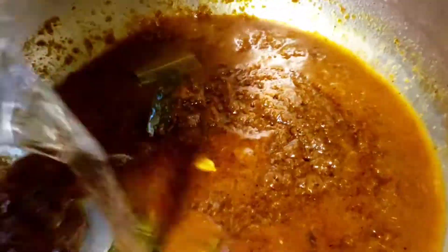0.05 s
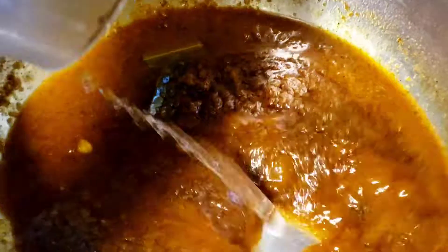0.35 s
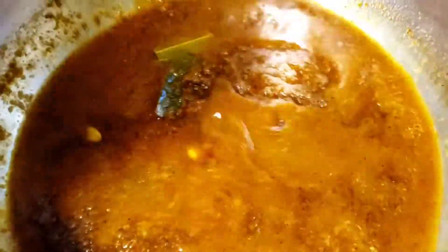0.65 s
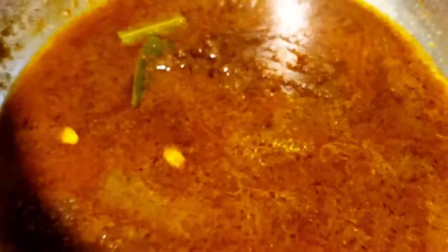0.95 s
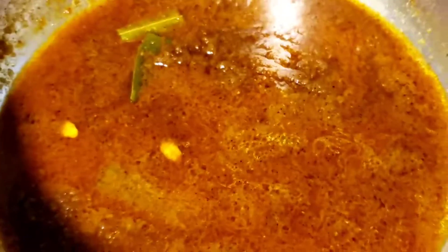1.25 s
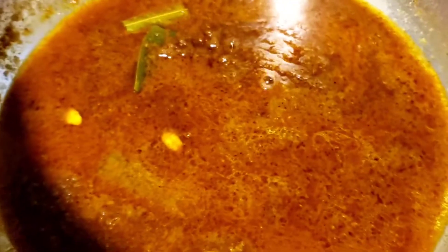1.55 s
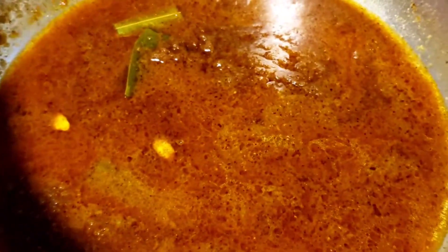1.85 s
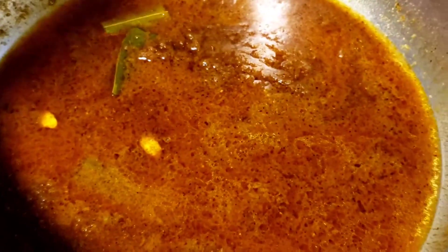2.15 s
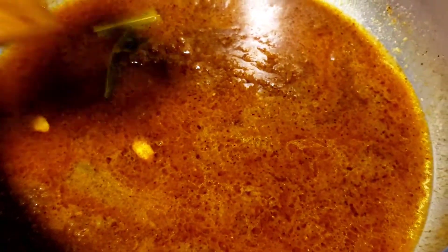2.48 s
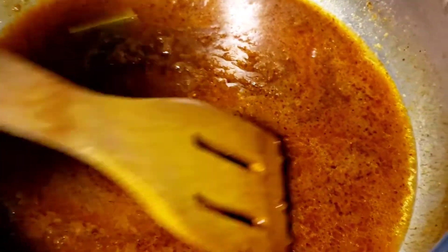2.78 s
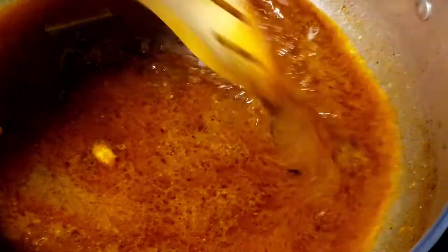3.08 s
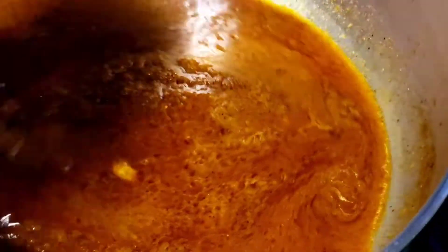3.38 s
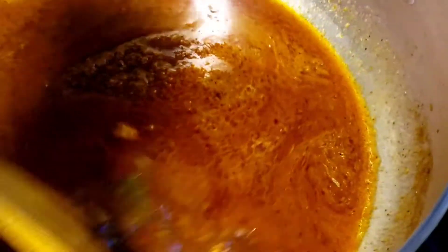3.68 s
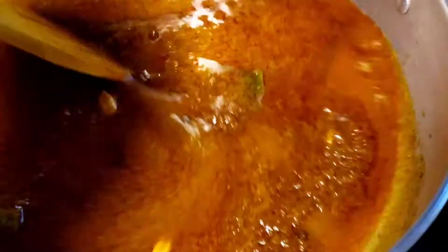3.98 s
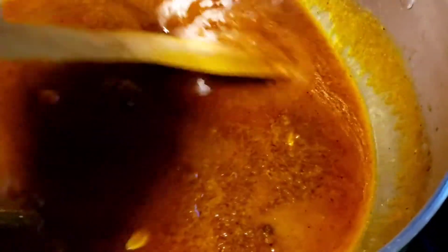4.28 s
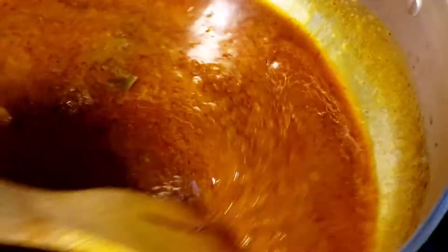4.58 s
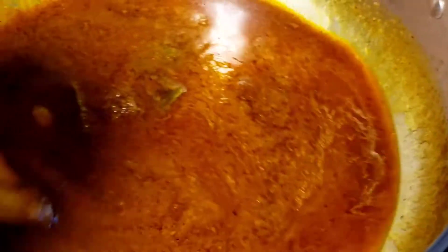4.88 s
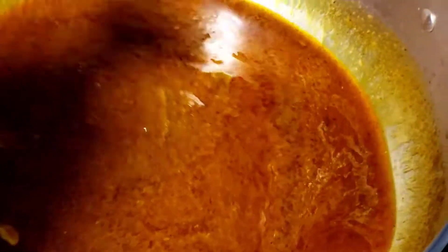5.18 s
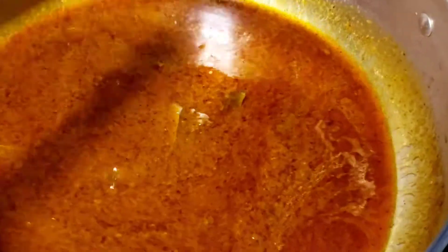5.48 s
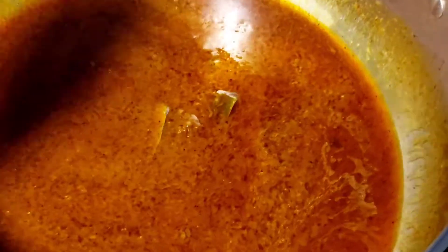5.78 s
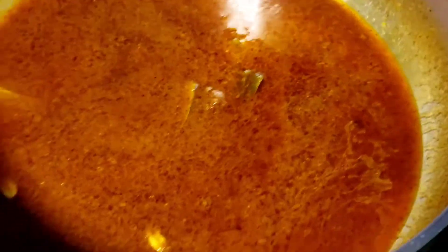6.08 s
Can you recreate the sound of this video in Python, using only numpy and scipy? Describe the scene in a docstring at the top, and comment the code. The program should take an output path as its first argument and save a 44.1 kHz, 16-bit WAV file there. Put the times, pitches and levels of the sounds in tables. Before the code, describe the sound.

Close above a pan in a small kitchen, a burst of steamy sizzling and bubbling starts as water lands in hot oil. It sinks to a soft simmer, with droplets snapping over the low rumble of a burner. About halfway through, a wooden spatula stirs for a couple of seconds with irregular ringing knocks, scrapes and a few tiny squeaks. Then only gentle simmering and the flame remain.

```python
"""In a small kitchen, a burner rumbles under a metal pan of hot oil and spice paste.
Water gulps in and flashes to steam with a loud sizzle, which sinks as the oil cools. The sauce then
simmers: tiny bubbles crackle on the hot metal and a few droplets burst as spits of oil.
A wooden spatula stirs, scraping and knocking the pan so that the metal rings."""
import sys
import numpy as np
from scipy import signal
from scipy.fft import rfft, irfft, next_fast_len
from scipy.io import wavfile

SR = 44100
rng = np.random.default_rng(int(sys.argv[2]) if len(sys.argv) > 2 else 0)


def log_audio(samples):
    """Write samples as a 16-bit WAV file to the path given in sys.argv[1]."""
    # one column per channel
    frames = np.atleast_2d(samples).T
    # limit to full scale, then quantise
    limited = np.clip(frames, -1, 1)
    pcm = np.round(limited * 32767).astype(np.int16)
    wavfile.write(sys.argv[1], SR, pcm)


N = 275625
TIME = np.arange(N) / SR
BAND_EDGES_HZ = np.geomspace(80, 15000, 16)


def from_db(db):
    """Turn decibels into a number to multiply by."""
    return np.exp(np.asarray(db) * (np.log(10) / 20))

def lean(left_db):
    """Gains that make the left side this much louder than the right; below 0 leans right."""
    return from_db(left_db * np.array([[.5], [-.5]]))

def rms_one(x):
    """Scale a sound to an average power of 1."""
    return x / np.sqrt(np.mean(x ** 2) + 1e-20)

def at_hz(points, hz):
    """Read a table at any pitch, sliding between its rows."""
    pitches, values = np.transpose(points)
    return np.interp(np.log(hz + 1e-9), np.log(pitches), values)

def near(hz, centre_hz, octaves):
    """A bell curve over pitch: 1 at the centre, 0 far away."""
    return np.exp(-(np.log2((hz + 1e-9) / centre_hz) / octaves) ** 2)

def ramp(start_s, length_s):
    """Rise from 0 to 1."""
    return np.clip((TIME - start_s) / length_s, 0, 1)

def drift(per_s):
    """A random wobble of about size 1."""
    knots = rng.standard_normal(2000)
    return rms_one(np.interp(TIME * per_s, np.arange(len(knots)), knots))

def noise():
    """Two unrelated white noises."""
    return rng.standard_normal((2, N))

def shaped(x, gain_at):
    """Filter a sound by giving each frequency its own gain."""
    size = next_fast_len(N + 4096)
    hz = np.arange(size // 2 + 1) * SR / size
    return irfft(rfft(x, size) * gain_at(hz), size)[..., :N]

def resonant(x, peaks):
    """Boost a few narrow pitches in a sound."""
    return shaped(x, lambda f: 1 + sum((from_db(db) - 1) / (1 + ((f - hz) / width) ** 2)
                                       for hz, width, db in peaks))

# How alike the left and right sides sound: (pitch [Hz], likeness [0 to 1])
LIKENESS = [(60, 0.99), (200, 0.91), (350, 0.81), (700, 0.66), (1400, 0.016), (3000, 0.051), (6000, 0)]
def two_ears(pair, hz):
    """Mix two unrelated sounds into left and right: alike in the bass, unrelated in the treble."""
    alike = np.clip(at_hz(LIKENESS, hz), 0, 1)
    return (np.sqrt(1 + alike) * pair[0] + np.sqrt(1 - alike) * pair[1] * [[1], [-1]]) / np.sqrt(2)

def coloured(pair, colour):
    """Stereo sound of power 1 with the given colour (its mix of low and high pitches)."""
    hz = np.arange(N // 2 + 1) * SR / N
    return rms_one(irfft(two_ears(rfft(pair), hz) * from_db(at_hz(colour, hz)), N))

def walls(x, echo_db):
    """Quick echoes off the pan, stove and tiles, different on each side."""
    out = x.copy()
    for k, lag in enumerate(rng.integers(SR // 300, SR // 40, 12)):
        out[k % 2, lag:] += from_db(echo_db) * x[k % 2, :-lag]
    return out

def ring(clicks, hz, t60):
    """Each click starts a tone; t60 is its ring time, the seconds it takes to fade by 60 dB."""
    decay, angle = from_db(-60 / (t60 * SR)), 2 * np.pi * hz / SR
    return signal.lfilter([0, np.sin(angle)], [1, -2 * decay * np.cos(angle), decay ** 2], clicks + 1e-18)

def grains(per_s, spread_db):
    """Random clicks of uneven size."""
    out, at = np.zeros(N), rng.integers(0, N, int(per_s * N / SR))
    sizes = from_db(spread_db * np.minimum(rng.exponential(1, len(at)), 4))
    out[at] = sizes * rng.choice([-1, 1], len(at))
    return out

def bubbles(low_hz, high_hz, per_s, spread_db, cycles, count):
    """Bubbles of `count` sizes burst at random, each ringing for a few cycles."""
    out = np.zeros((2, N))
    for k, hz in enumerate(np.geomspace(low_hz, high_hz, count)):
        out[k % 2] += np.sqrt(hz) * rms_one(ring(grains(per_s / count, spread_db), hz, cycles / hz))
    return rms_one(out)

def ping(s, level_db, hz, t60):
    """One bubble: a tone that swells in about two cycles and dies away."""
    out, t, start = np.zeros(N), np.arange(SR // 10) / SR, round(s * SR)
    swell = 1 - np.exp(-t * hz / 2)
    out[start:start + len(t)] = swell * from_db(level_db - 60 * t / t60) * np.sin(2 * np.pi * hz * t)
    return out

def glides(rows, waver):
    """Short tones that swell, slide and fade; the pitch wobbles by the fraction `waver`."""
    out = np.zeros(N)
    for s, length, start_hz, end_hz, db in rows:
        progress, start = np.linspace(0, 1, int(length * SR)), round(s * SR)
        hz = (start_hz + (end_hz - start_hz) * progress) * (1 + waver * drift(610)[:len(progress)])
        tone = np.sin(2 * np.pi * np.cumsum(hz) / SR)
        out[start:start + len(tone)] += from_db(db) * np.sin(np.pi * progress) * tone
    return out

def bursts(hits, shared_colour, t60s, rise_s, crack_s, tail_db):
    """Each hit is a short crack of noise with a tail that fades at its own speed in each pitch band."""
    t = np.arange(SR // 3) / SR
    out, noises = np.zeros((2, N)), rng.standard_normal((len(hits), 2, 2, len(t)))
    for k, (low, high) in enumerate(zip(BAND_EDGES_HZ, BAND_EDGES_HZ[1:])):
        hz, track = np.sqrt(low * high), np.zeros((2, N + len(t)))
        tail = from_db(tail_db - 60 * t / at_hz(t60s, hz))
        envelope = (1 - np.exp(-t / rise_s)) * (np.exp(-t / crack_s) + tail)
        for (s, colour, left_db), white in zip(hits, noises):
            gain = from_db(at_hz(colour, hz) + at_hz(shared_colour, hz)) * lean(left_db)
            start = round(s * SR)
            track[:, start:start + len(t)] += gain * envelope * two_ears(white[k % 2], hz)
        band = signal.butter(2, [low, high], "band", fs=SR, output="sos")
        out += signal.sosfilt(band, track[:, :N] + 1e-18)
    return out


# Colour of the stove's rumble: (pitch [Hz], level [dB])
RUMBLE_COLOUR = [(25, 2.5), (45, -0.5), (62, 11.5), (76, 3.5), (91, 5.5), (110, -5), (150, -8.5),
                 (300, -46)]
def stove(knocks):
    """The stove rumbles, louder once the spatula goes in; each knock shakes the pan on it."""
    rumble_db, rise_db, shake_db, shake_t60 = -53, 5, -18.5, 1.3
    jolts = np.zeros(N)
    for s, db, *_ in knocks:
        jolts[round(s * SR)] = from_db(db + shake_db) ** 2
    shake_power = signal.lfilter([1], [1, -from_db(-60 / (shake_t60 * SR)) ** 2], jolts)
    steady = from_db(rumble_db + rise_db * ramp(start_s=2.47, length_s=0.79))
    return np.sqrt(steady ** 2 + shake_power) * coloured(noise(), RUMBLE_COLOUR)

# Colour of the flame: (pitch [Hz], level [dB])
FLAME_COLOUR = [(50, -8.5), (130, -3.5), (180, -6), (215, -12.5), (330, -5.5), (410, -12), (690, -9),
                (800, -14.5), (1120, -14), (1550, -25.5), (3000, -39)]
# The flame's hums and the hiss of its jet: (pitch [Hz], width [Hz], boost [dB])
FLAME_PEAKS = [(175.4, 14, 11.5), (237.3, 2.9, 15), (686, 8.3, 5.5), (953, 3.8, 8), (3380, 247, 22)]
def flame():
    """The flame rushes steadily, with a few narrow hums and a thin hiss."""
    return resonant(from_db(-57.5) * coloured(noise(), FLAME_COLOUR), FLAME_PEAKS)

# Brief flares and sags of the frying: (time [s], half-length [s], change [dB])
FLARES = [(0.2, 0.028, -2), (0.33, 0.029, 2), (0.582, 0.06, 0), (0.988, 0.02, 0.5), (3.302, 0.02, 5),
          (3.512, 0.022, 4.5), (3.773, 0.029, 5.5), (3.89, 0.034, 5.5), (3.961, 0.019, 5)]
def flaring():
    """A gain that jumps or dips as liquid meets or leaves bare hot metal."""
    return from_db(sum(db * np.exp(-((TIME - s) / length) ** 2) for s, length, db in FLARES))

COVERED_S, COVERING_S = 1.61, 0.015   # when, and how fast, the sauce covers the last hot spot
# How hard the edge of the sauce fries: (time [s], level [dB])
SIMMER_LEVELS = [(1.62, -60), (2.2, -61), (2.52, -58.5), (2.92, -58.5), (3.72, -55.5), (4.2, -57.5),
                 (4.77, -55.5), (5.15, -62.5), (5.45, -63.5), (6.25, -64)]
# Colour of the frying: (pitch [Hz], level [dB])
FRYING_COLOUR = [(600, -4), (2000, -11), (3000, -3), (4300, -3), (5500, 2.5), (6500, -0.5), (7800, -4),
                 (9200, -2.5), (12000, 1), (14500, -2)]
def simmering():
    """Tiny bubbles crackle where sauce meets bare metal, mostly on the right; the finest ones fizz."""
    level_db = np.interp(TIME, *np.transpose(SIMMER_LEVELS))
    fizz_db = level_db.mean() + 1.08 * (level_db - level_db.mean())   # the fizz swings a little more
    crackle = bubbles(1950, 10200, per_s=3000, spread_db=1, cycles=3.7, count=20) + 2.23 * noise()
    pops = bubbles(3500, 13500, per_s=45, spread_db=2, cycles=12, count=10)
    crackle = coloured(walls(rms_one(crackle) + from_db(-13) * pops, echo_db=-17), FRYING_COLOUR)
    fizz = shaped(crackle, lambda hz: 1 - 1 / (1 + (hz / 8000) ** 8))   # the part above 8000 Hz
    frying = from_db(level_db + 4.5) * (crackle - fizz) + from_db(fizz_db + 4) * fizz
    return ramp(COVERED_S - COVERING_S, COVERING_S) * flaring() * lean(-3.5) * frying

# Bubbles in the sauce: (time [s], level [dB], pitch [Hz])
SAUCE_BLIPS = [(1.859, -48, 775), (1.91, -43, 730), (2.302, -38, 523), (2.343, -50, 565),
               (2.399, -39.5, 710), (2.459, -44, 566), (2.686, -47, 945)]
def blipping():
    """Slow bubbles break in the thick sauce, each with a short note."""
    return from_db(8.5) * sum(ping(s, db, hz, t60=0.011) for s, db, hz in SAUCE_BLIPS)

# Spits of oil: (time [s], level [dB], pitch [Hz], drop away from that pitch [dB per octave])
SPITS = [(1.648, -44.5, 6800, 19), (1.6892, -54, 11400, 3), (1.8563, -48, 5300, 8),
         (1.8916, -47, 11900, 14), (1.909, -48.5, 7000, 1), (2.164, -57, 5300, 3), (2.283, -50, 11500, 15),
         (2.29, -51, 12500, 1), (2.332, -50, 7300, 12), (2.338, -53, 11500, 12), (2.4304, -52, 6220, 17),
         (2.458, -55.5, 5300, -1.5), (2.486, -53, 6000, 14), (2.58, -47.5, 13300, 5),
         (2.6864, -41.5, 4580, 10), (2.695, -46, 5400, 2.5), (2.859, -46, 6450, 3), (3.026, -45, 3970, 7),
         (3.126, -46, 14000, 0.5), (3.2059, -43.5, 5430, 8), (3.2131, -45.5, 6000, 3),
         (3.418, -47, 12000, 1), (3.616, -43, 4520, 14), (3.626, -37, 4880, 18), (3.669, -43, 5750, 2),
         (3.677, -45.5, 13200, 3), (3.833, -47, 13700, 5)]
# Colour shared by all the snaps: (pitch [Hz], level [dB])
SPIT_COLOUR = [(100, -18), (1000, 9), (2000, -7), (3500, 0.5), (5700, 5), (8000, -7), (12000, 4),
               (14500, 11)]
# The finest spits lean to the right: (pitch [Hz], left minus right [dB])
SPIT_SIDE = [(5000, 1.5), (13000, -0.5)]
def spitting():
    """Single droplets burst in the oil with a snap and a brief ring."""
    hits, rings = [], np.zeros((2, N))
    for s, db, hz, drop_db in SPITS:
        octaves_away = np.minimum(abs(np.log2(BAND_EDGES_HZ / hz)), 2)
        left_db = at_hz(SPIT_SIDE, hz)
        hits.append((s, np.c_[BAND_EDGES_HZ, db - drop_db * octaves_away], left_db))
        rings += ping(s, db + 4, hz, t60=0.014) * lean(left_db)
    snaps = bursts(hits, SPIT_COLOUR, t60s=[(1000, 0.29), (12000, 0.13)],
                   rise_s=0.0006, crack_s=0.001, tail_db=-21)
    return from_db(18) * snaps + rings

BOTTOM_HZ, WALL_HZ = 147, 317   # pitches of the pan's bottom and wall
# The notes the filled pan rings at: (pitch [Hz], level [dB], ring time [s])
PAN_NOTES = [(132, -2, 0.22), (155.8, -10.5, 0.49), (276, 2, 0.026), (307.7, -3.5, 0.2), (342, -10.5, 0.22),
             (372.2, -7.5, 0.22), (473.4, -18.5, 0.22), (514, -6, 0.1), (575, -26, 0.16), (695, -9.5, 0.2),
             (769, -14.5, 0.11), (858, -21, 0.24), (1006, -6, 0.15), (1117, -10, 0.21), (1166, -7, 0.072),
             (1263, -6, 0.089), (1390, -14, 0.36), (1650, -13, 0.18), (1745, -7.5, 0.091),
             (1980, -22, 0.23), (2600, -10, 0.089), (3640, -33, 0.093), (3900, -33, .12),
             (5490, 11.5, 0.022), (6220, -2.5, 0.06)]
def pan(hits, rubbing, chance_db):
    """Hits and rubbing ring the pan, a little differently each time; each spot favours some notes."""
    out, at = np.zeros((2, N)), [round(hit[0] * SR) for hit in hits]
    chances = rng.normal(0, chance_db, (len(hits), len(PAN_NOTES)))
    for k, (hz, db, t60) in enumerate(PAN_NOTES):
        force = rubbing * WALL_HZ / max(hz, WALL_HZ)
        pushes = [at_hz(colour, hz) + boost_db * near(hz, favoured_hz, octaves=0.12)
                  for _, colour, favoured_hz, boost_db in hits]
        force[at] += from_db(pushes + chances[:, k])
        sign = -1 if k % 4 == 2 else 1   # some vibrations face away from the microphones
        note = sign * from_db(db) * ring(force, hz, t60)
        out += [note, np.roll(note, 3 * (k % 5 - 2))]   # shifted a few samples on the right
    return out * lean(1)

# Colour of the pan's many crowded notes: (pitch [Hz], level [dB])
CLATTER_COLOUR = [(100, -5.5), (200, -6), (330, -7), (440, -6.5), (700, -5.5), (1100, 0), (2200, -1.5),
                  (3500, -1.5), (5700, -2.5), (8000, -8.5), (14000, -16)]
# How long they last: (pitch [Hz], ring time [s])
CLATTER_T60 = [(100, 0.58), (300, 0.44), (1000, 0.32), (2000, 0.27), (5000, 0.16), (14000, 0.18)]
def clatter(hits):
    """A knock wakes so many notes that they blur into noise, strongest near the pan's main notes."""
    level_db, boost_db, width_hz = 12, 5, 14
    blur = bursts([(s, colour, 0) for s, colour, *_ in hits], CLATTER_COLOUR, CLATTER_T60,
                  rise_s=0.0011, crack_s=0.0035, tail_db=0)
    def gain_at(f):
        peaks = sum(1 / (1 + 1j * (f - hz) / width_hz) for hz, *_ in PAN_NOTES)
        return 1 + (from_db(boost_db) - 1) * peaks
    return shaped(from_db(level_db) * blur, gain_at)

def ticks(knocks):
    """Wood slaps the thin wall: a tick with a bright edge, as the pan starts to ring."""
    clicks = np.zeros(N)
    for s, _, _, _, tick_db, *_ in knocks:
        clicks[round(s * SR)] = from_db(tick_db)
    return ring(clicks, hz=1110, t60=0.0021) + from_db(-10.5) * ring(clicks, hz=5270, t60=0.0012)

# Squeaks of the spatula: (time [s], length [s], pitch [Hz], level [dB])
SQUEAKS = [(3.4, .045, 690, -45), (3.622, .048, 880, -46), (4.350, .075, 1147, -42),
           (4.350, .048, 315, -34), (4.808, .034, 1260, -45)]
def squeaking():
    """Wood catches on the metal and keeps one note singing."""
    return glides([(s, length, hz, hz, db) for s, length, hz, db in SQUEAKS], waver=0.018)

# Push of a medium-hard wooden knock: (pitch [Hz], level [dB])
KNOCK_COLOUR = [(315, 0), (480, -4.5), (700, -4), (1020, -12), (2200, -19), (4360, -25)]
def knock_colour(strength_db, hardness, boom_db, missed_hz):
    """Harder knocks are brighter, the bottom booms, and notes that are still at that spot stay weak."""
    hz = BAND_EDGES_HZ
    brightness = hardness * np.log2(np.clip(hz, WALL_HZ, KNOCK_COLOUR[-1][0]) / WALL_HZ)
    boom = at_hz([(BOTTOM_HZ, boom_db), (WALL_HZ, 0)], hz)
    dip = -6 * near(hz, missed_hz, octaves=0.29)
    return np.c_[hz, strength_db + at_hz(KNOCK_COLOUR, hz) + brightness + boom + dip]

# Spatula strokes over the bottom: (time [s], length [s], scrape level [dB])
STROKES = [(3.05, 0.13, -43), (3.404, 0.34, -45.5), (3.79, 0.18, -46.5), (3.935, 0.039, -51),
           (4.083, 0.13, -60), (4.33, 0.06, -50), (4.434, 0.056, -41), (4.734, 0.26, -51)]
# Spatula knocks: (time [s], strength [dB], hardness [dB per octave], boom [dB], tick [dB],
# favoured pitch [Hz], its boost [dB], missed pitch [Hz])
KNOCKS = [(3.014, -44, -4, 2.5, -53, 510, 4, 1000), (3.101, -33.5, -3, 3, -40, 500, 3, 1080),
          (3.150, -42, -11, 11, -46, 695, 10, 1300), (3.3, -47.5, 0.5, -4, -32.5, 700, 6, 1800),
          (3.387, -34, -2.5, 2, -42, 336, 4.5, 520), (3.405, -41.5, 1, -13, -41, 695, 17, 1390),
          (3.446, -34.5, -9, -18, -47, 373, 4.5, 870), (3.550, -27.5, -2.6, -2.5, -44, 514, 8, 1180),
          (3.571, -35.5, 4, -26, -31, 695, 5, 1720), (3.595, -36.5, 0.5, 5, -40, 342, 7.5, 1050),
          (3.725, -50.5, 3, 5, -48, 1280, 1, 800), (3.821, -43, 1.5, 8.5, -46, 1700, -2, 620),
          (3.846, -33.5, -3.5, 1.5, -41, 695, 4, 920), (3.881, -53, 0, 17, -54, 514, 1, 310),
          (4.059, -40.5, -2, 7.5, -53, 320, 4.5, 1100), (4.119, -22, -0.84, -4, -28, 300, 7.5, 830),
          (4.181, -25, 0.84, -4, -13.5, 695, 8.5, 1370), (4.200, -41, -7, -9, -39, 510, 25, 1100),
          (4.312, -33.5, -2, -7, -32.5, 695, 7, 1800), (4.352, -27.5, -1.5, -3.5, -39, 695, 3, 1400),
          (4.425, -31, 0.5, -8, -22.5, 750, 11.5, 1430), (4.446, -42, -5, -19, -47, 695, 5, 500),
          (4.7105, -36, 5.5, -12, -33, 1263, 8, 900), (4.713, -23.5, 0, -0.5, -28, 348, 8, 500),
          (4.833, -41, 5, 5, -31, 317, 11.5, 620), (4.850, -39, 0, 10.5, -44, 1390, 6, 310),
          (4.89, -42.5, 1.5, -2, -27, 1263, 17, 700), (5.983, -45, -1.5, 7.5, -41, 695, 5.5, 312)]
def stirring():
    """The spatula slips over the bottom, pushes the sauce about and knocks on the pan."""
    hits = [(s, knock_colour(db, hardness, boom_db, missed_hz), favoured_hz, boost_db)
            for s, db, hardness, boom_db, _, favoured_hz, boost_db, missed_hz in KNOCKS]
    moving, pressing = np.zeros(N), np.zeros(N)
    for s, length, db in STROKES:
        stroke = ramp(s, length_s=0.018) * (1 - ramp(s + length, length_s=0.08))
        moving += stroke
        pressing += stroke * from_db(db)
    slips = pressing * from_db(-35) * rms_one(grains(per_s=300, spread_db=3.5))
    swish = moving * from_db(-60) * bubbles(320, 1900, per_s=1200, spread_db=1.5, cycles=1.9, count=14)
    squeaks = squeaking()
    ringing = from_db(1.5) * pan(hits, slips, chance_db=3.5)
    return ticks(KNOCKS) + ringing + squeaks + swish + clatter(hits)

# Gulps of water landing: (time [s], strength [dB])
GULPS = [(0.019, -41), (0.26, -37.5), (0.357, -37.5), (0.393, -59), (0.453, -45), (0.526, -42),
         (0.987, -41), (1.02, -49), (1.134, -42), (1.285, -43), (1.443, -42.5), (1.535, -46.5)]
# Push of one gulp: (pitch [Hz], level [dB])
GULP_COLOUR = [(144, -0.5), (315, -8), (1020, -10)]
# Bubbles of trapped air: (time [s], level [dB], pitch [Hz])
GURGLES = [(0.008, -40, 1094), (0.041, -45, 1140), (0.205, -39.5, 297), (0.27, -45, 313), (0.278, -45, 813),
           (0.39, -43, 295), (0.479, -41, 1135), (0.69, -42.5, 700), (0.7, -42, 1143), (0.99, -48, 690),
           (1.139, -54, 299), (1.29, -58, 1160)]
def gulping():
    """The uneven stream thumps the pan softly and drags gurgling air under."""
    hits = [(s, [(hz, db + push_db) for hz, push_db in GULP_COLOUR], BOTTOM_HZ, 0) for s, db in GULPS]
    gurgles = sum(ping(s, db, hz, t60=0.098) for s, db, hz in GURGLES)
    return pan(hits, rubbing=np.zeros(N), chance_db=2.5) + gurgles

# Spurts of steam: (time [s], half-length [s], pitch [Hz], level [dB])
STEAM_JETS = [(0.137, 0.024, 5300, -44), (0.272, 0.022, 2600, -46), (0.356, 0.0088, 12800, -36),
              (0.43, 0.02, 3830, -46), (0.49, 0.016, 5000, -40.5)]
def steam_jets():
    """Steam spurts from the pour, each jet a brief, narrow hiss."""
    out = np.zeros((2, N))
    for s, length, jet_hz, db in STEAM_JETS:
        hiss = shaped(noise(), lambda hz: near(hz, jet_hz, octaves=0.2))
        out += from_db(db) * np.exp(-((TIME - s) / length) ** 2) * rms_one(hiss)
    return out

# Colour of the boiling: (pitch [Hz], level [dB])
BOIL_COLOUR = [(140, -29), (230, -32), (310, -4), (430, -5), (600, -0.5), (850, -0.5), (1150, 1.5),
               (1400, 4), (1750, -5), (2400, -1.5), (4000, 4)]
# Pitches that the hollow of the pan boosts: (pitch [Hz], width [Hz], boost [dB])
PAN_HOLLOW = [(690, 37, 5.5), (900, 14, 4), (1160, 31, 8), (1700, 30, 12)]
def boiling(steam):
    """Bigger bubbles boil under the sizzle and ring in the hollow of the pan."""
    flicker_db, below_sizzle_db = 1.1, 6.5
    boil = bubbles(355, 3620, per_s=500, spread_db=-1, cycles=25, count=24) + noise()
    boil = coloured(walls(boil, echo_db=-13), BOIL_COLOUR)
    boil = rms_one(resonant(boil, PAN_HOLLOW))
    return steam * from_db(flicker_db * drift(per_s=24.6) - below_sizzle_db) * boil

# Colour of the sizzle: (pitch [Hz], level [dB])
SIZZLE_COLOUR = [(600, -4.5), (2000, -3.5), (3000, -0.5), (4200, 0), (5400, 3.5), (6500, 1), (7700, -1),
                 (9200, 0), (11000, 0.5), (13000, 0.5), (14500, -8.5)]
# Which side the sizzle is louder on: (pitch [Hz], left minus right [dB])
SIZZLE_SIDE = [(1200, 1.5), (2400, 0), (4400, -3.5), (6500, -4), (11000, 0), (14500, -13)]
def sizzling(steam):
    """Water flashes to steam: thousands of tiny bubbles, with spatter and spurts, mostly on the right."""
    fizz = bubbles(1080, 20000, per_s=6000, spread_db=1, cycles=2.9, count=24) + 1.83 * noise()
    spatter = bubbles(2000, 14000, per_s=320, spread_db=2.5, cycles=14, count=20)
    sizzle = coloured(walls(rms_one(fizz) + from_db(-14.5) * spatter, echo_db=-17), SIZZLE_COLOUR)
    flicker = from_db(0.9 * drift(per_s=41.2))
    sizzle = steam * flaring() * flicker * sizzle + steam_jets()
    return shaped(sizzle, lambda hz: lean(at_hz(SIZZLE_SIDE, hz)))

# Droplets whistling as they boil away:
# (time [s], length [s], start pitch [Hz], end pitch [Hz], level [dB])
WHISTLES = [(0.108, 0.028, 4900, 3350, -37.5), (0.126, 0.024, 3430, 3060, -39),
            (0.413, 0.0245, 4100, 3730, -41)]
def pouring():
    """Steam holds while water runs in, sinks as the oil cools and stops when the hot spot is covered."""
    pour_db, pour_end_s, cooling_db_per_s, hot_spot_db = -34.5, 0.44, 16.5, -53
    steam = from_db(pour_db - cooling_db_per_s * np.maximum(TIME - pour_end_s, 0))
    steam = np.hypot(steam, from_db(hot_spot_db)) * (1 - ramp(COVERED_S, COVERING_S))
    return sizzling(steam) + boiling(steam) + glides(WHISTLES, waver=0.037)


def scene():
    """Everything heard from just above the pan."""
    cooking = pouring() + simmering() + spitting() + blipping() + gulping()
    return cooking + stirring() + stove(KNOCKS) + flame()

def record(dry):
    """The left microphone's opening dulls part of the treble; the very lowest and highest sounds go."""
    dip_hz, dip_width_hz, dip_depth = 9080, 2340, 0.84
    low_cut_hz, high_cut_hz = 42, 14650
    left = shaped(dry[0], lambda hz: 1 - dip_depth / (1 + ((hz - dip_hz) / dip_width_hz) ** 2))
    heard = signal.sosfilt(signal.butter(2, low_cut_hz, "high", fs=SR, output="sos"), [left, dry[1]])
    return shaped(heard, lambda hz: 1 / np.sqrt(1 + (hz / high_cut_hz) ** 200))


dry = scene()
out = record(dry)
log_audio(out)
```